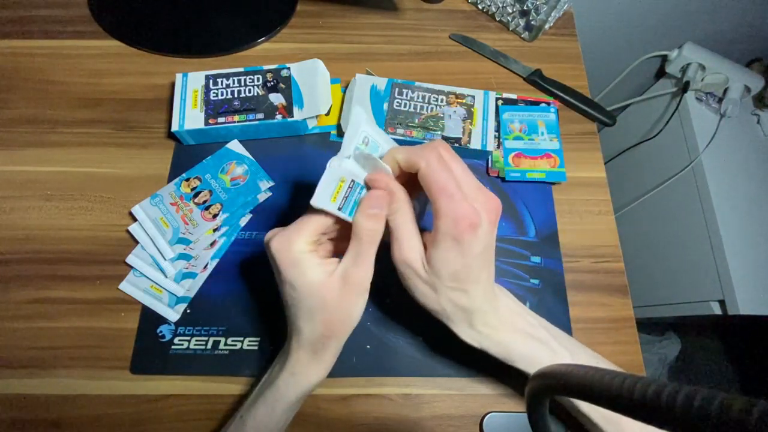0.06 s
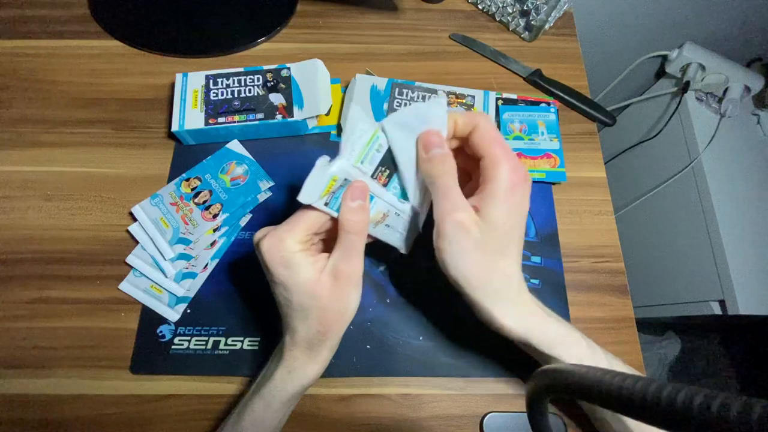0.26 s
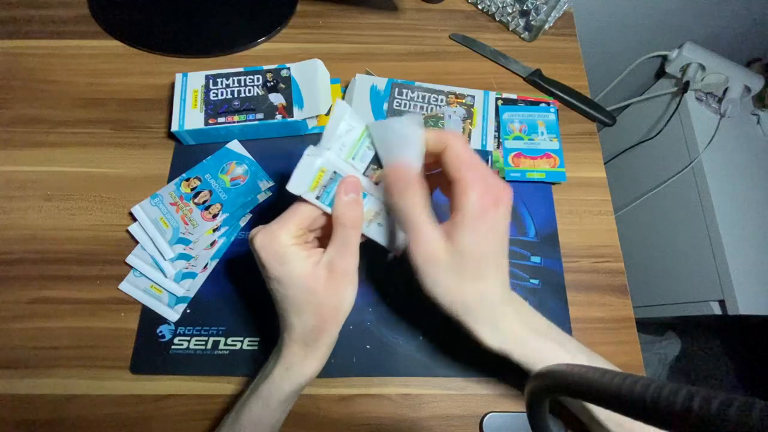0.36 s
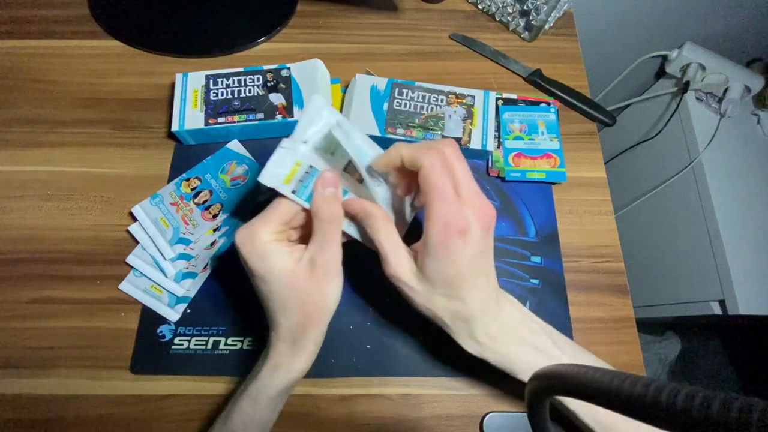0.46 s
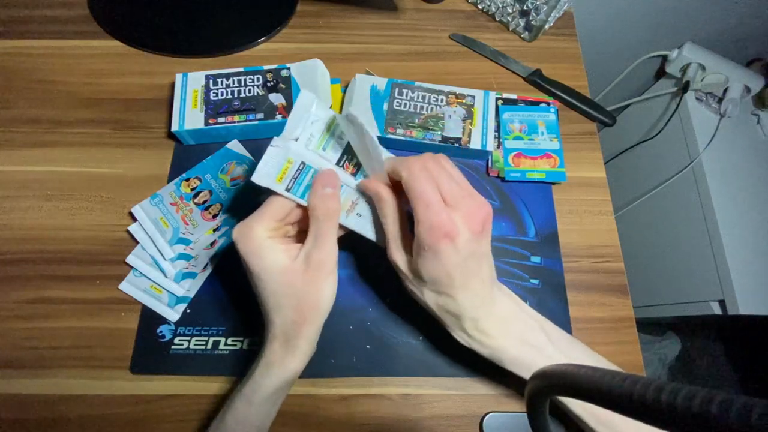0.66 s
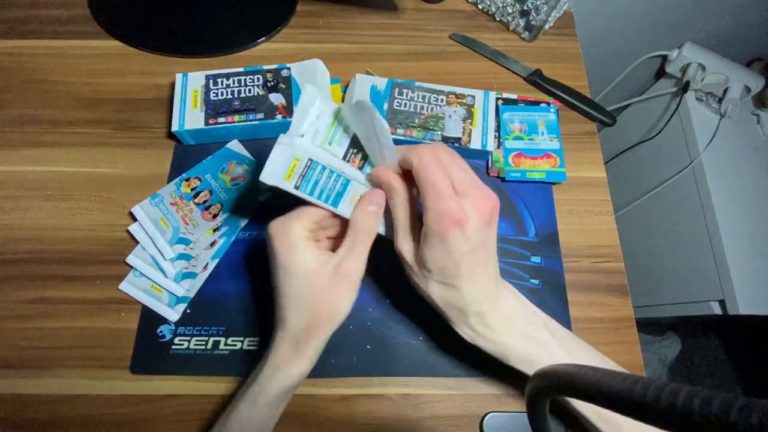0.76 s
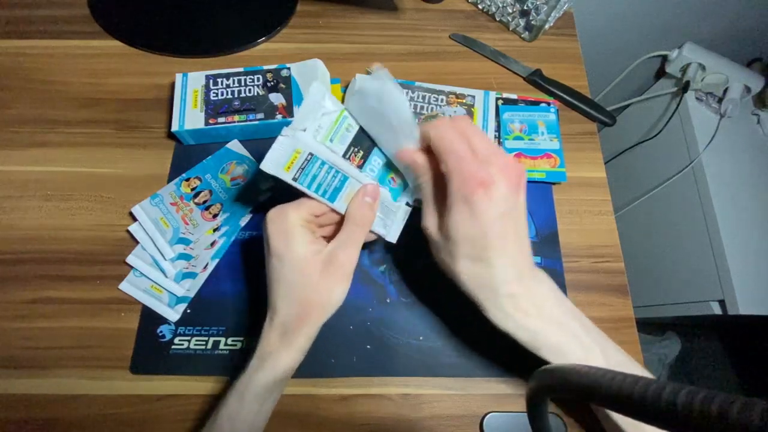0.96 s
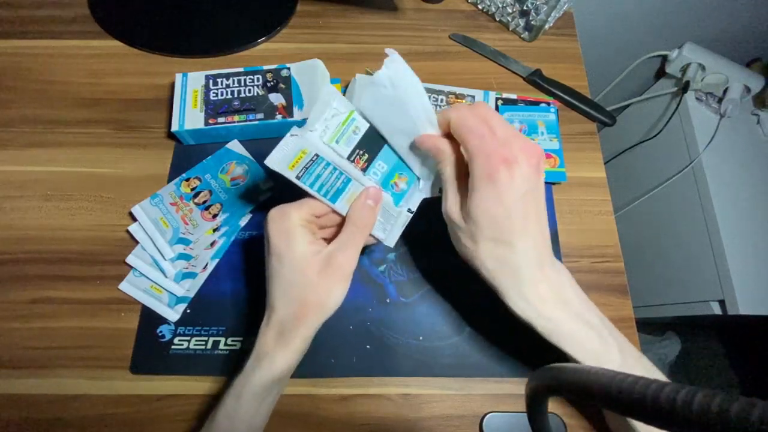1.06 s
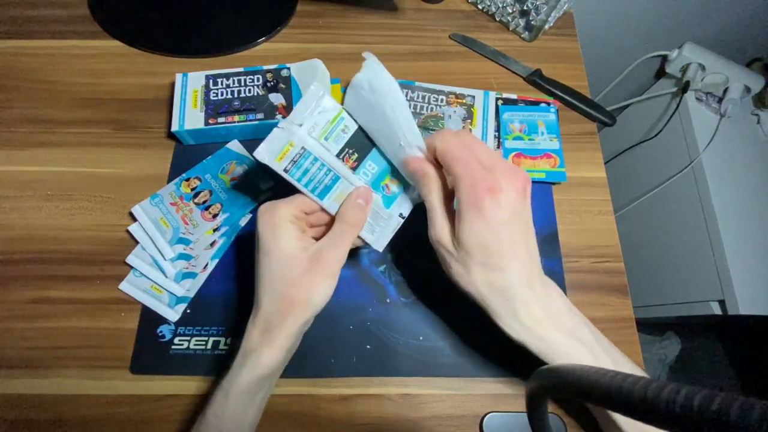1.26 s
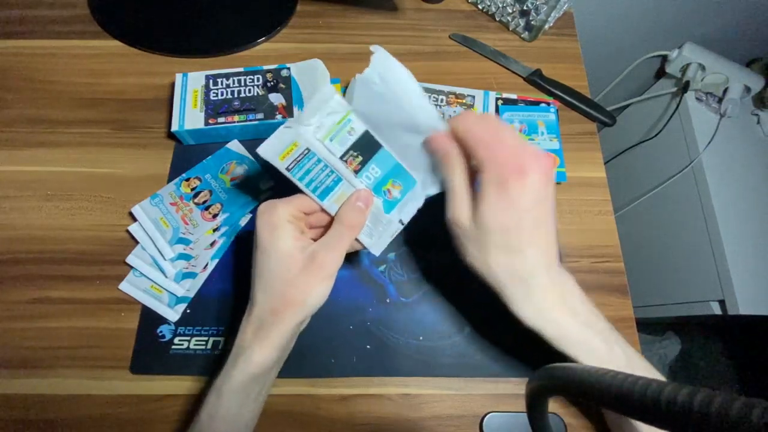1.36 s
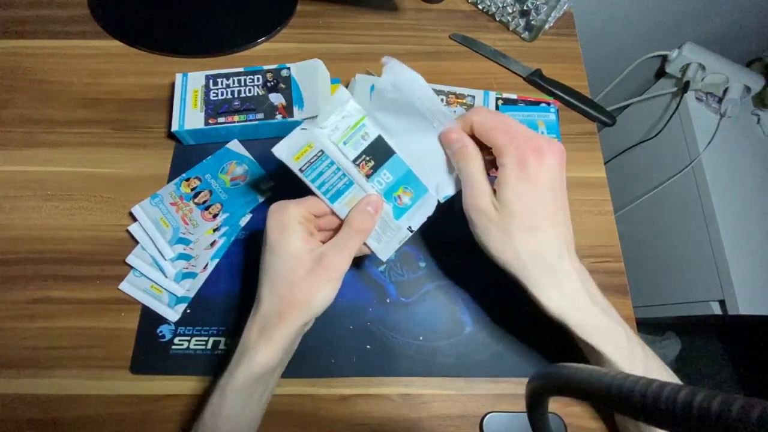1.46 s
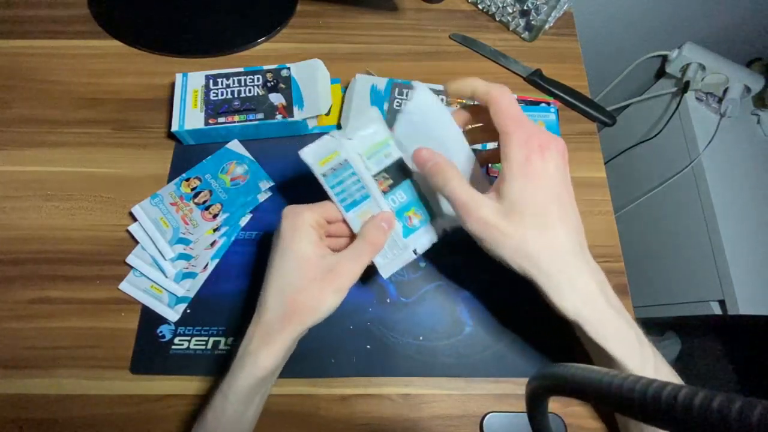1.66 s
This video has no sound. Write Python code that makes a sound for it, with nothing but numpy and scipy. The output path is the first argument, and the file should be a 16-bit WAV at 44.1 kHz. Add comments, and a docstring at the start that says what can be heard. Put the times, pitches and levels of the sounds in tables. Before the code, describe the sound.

Close, crisp foil crinkling over a desk: light finger slides and tiny snaps, one sharp early rip, a snapping peel midway, a fuller final tug, then near silence with faint low room hum.

```python
"""A faint room hum and the hiss of fingers sliding on foil come first, with single sharp snaps of creases.
Over a desk a foil card wrapper is then torn by hand in three quick pulls: a rip, a longer peel and a last tug.
Each pull is a dense train of tiny random clicks in three bands: treble fractures, rasping foil, flapping sheet.
The slide is ticks on shaped noise, each snap a noise burst with a pitched ring, each bump a swell of band noise.
A small room answers, and two close microphone ports pick up the sound."""
import sys
import numpy as np
from scipy import signal
from scipy.fft import rfft, irfft, next_fast_len
from scipy.io import wavfile
from scipy.ndimage import uniform_filter1d

SR = 44100
rng = np.random.default_rng(int(sys.argv[2]) if len(sys.argv) > 2 else 0)


def dump_mix(stems):
    """Bounce the given channels to the path in sys.argv[1] as a 16-bit WAV at rate SR."""
    frames = np.atleast_2d(stems).T  # one column per channel
    limited = np.clip(frames, -1, 1)  # hard clip at full scale
    pcm = np.round(limited * 32767).astype(np.int16)
    wavfile.write(sys.argv[1], SR, pcm)


N = 74970  # length [samples]


def amp(db):
    """Level to amplitude ratio: 20 dB is a factor of ten."""
    return 10 ** (np.asarray(db) / 20)


def unit(x):
    """Normalisation: x scaled to unit rms."""
    return x / np.sqrt(np.mean(x ** 2) + 1e-20)


def along(points, hz):
    """Logarithmic frequency scale: (frequency [Hz], value) points joined by straight lines on it."""
    point_hz, values = np.transpose(points)
    return np.interp(np.log(hz + 1), np.log(point_hz + 1), values)


def gains(rows):
    """Amplitude envelopes: one gain per sample for each dB column, inaudible outside the table's times."""
    times, *levels = np.transpose(rows)
    t = np.arange(N) / SR
    return [amp(np.interp(t, times, level, left=-150, right=-150)) for level in levels]


def filtered(x, response):
    """Linear filtering: the spectrum of x is multiplied by a response of frequency."""
    size = next_fast_len(N + SR // 2)
    hz = np.fft.rfftfreq(size, 1 / SR)
    return irfft(rfft(x, size) * response(hz), size)[..., :N]


def coloured(x, spectrum):
    """Spectral shaping: x filtered by a dB curve and brought to unit rms."""
    return unit(filtered(x, lambda hz: amp(along(spectrum, hz))))


def causal(db):
    """Minimum phase: folding the cepstrum of a dB curve gives a response that never precedes its cause."""
    cepstrum = irfft(db * np.log(10) / 20)
    half = len(cepstrum) // 2
    cepstrum[1:half] *= 2
    cepstrum[half + 1:] = 0
    return np.exp(rfft(cepstrum))


def bell(hz, centre_hz, width_oct):
    """Resonance shape: a bell of height 1 on a log-frequency axis, its standard deviation in octaves."""
    return np.exp(-.5 * (np.log2((hz + 1) / centre_hz) / width_oct) ** 2)


def crackle(spectrum, per_s, scatter_db, count=10, size=500):
    """Shot noise: random clicks ring several foil facets; dividing by the running rms steadies the level."""
    grain_t60_s = 0.0043
    t = np.arange(size) / SR
    facets = rng.standard_normal((count, 2, size)) * amp(-60 * t / grain_t60_s)
    struck = rng.random((count, 1, N)) < per_s / SR / count
    clicks = struck * amp(scatter_db * rng.standard_normal((count, 1, N)))
    grains = signal.oaconvolve(clicks, facets, axes=2).sum(0)[:, :N]
    x = coloured(grains, spectrum)
    running_power = np.abs(uniform_filter1d(np.mean(x ** 2, axis=0), size))
    return x / np.sqrt(running_power + 0.018)  # the floor keeps sparse gaps quiet


def room_hum():
    """Stationary background noise: Gaussian noise shaped into the low hum of the room."""
    hum_db = -76.5
    # hum spectrum: (frequency [Hz], relative level [dB])
    hum_spectrum = [(28, -42), (38, -20), (50, 0.5), (75, -8.5), (130, -12.5), (400, -35), (2000, -35),
                    (16000, -56)]
    return amp(hum_db) * coloured(rng.standard_normal((2, N)), hum_spectrum)


def fingers():
    """Stick-slip friction: skin slipping on foil gives faint ticks on a soft hiss."""
    slips_per_s, scatter_db = 700, 7.0
    ticks_over_hiss_db = 0
    hiss_db, body_db = -2.5, 0  # trims added to the level columns
    # course of the slide: (time [s], relative treble level [dB], relative body level [dB])
    slide_levels = [(0, -55.5, -73), (0.04, -55.5, -72), (0.11, -56.5, -74.5), (0.16, -57, -54.5),
                    (0.33, -39, -74), (0.41, -49.5, -52), (0.46, -55, -60), (0.515, -60, -62),
                    (0.53, -40, -67), (0.545, -45.5, -47.5), (0.56, -58, -69), (0.59, -58, -63),
                    (0.615, -52, -49), (0.665, -48, -60.5), (0.70, -44.5, -57), (0.77, -53.5, -64),
                    (0.805, -54.5, -71.5), (0.86, -43.5, -52.5), (1.0, -34.5, -82), (1.16, -59, -62),
                    (1.19, -43.5, -42.5), (1.22, -53.5, -47), (1.265, -57, -50), (1.30, -55, -50.5),
                    (1.322, -41, -43), (1.34, -50, -56.5), (1.5, -49.5, -54), (1.56, -65.5, -61),
                    (1.625, -65, -41.5), (1.66, -70, -60), (1.7, -72, -58)]
    # treble and body spectra of the rub: (frequency [Hz], relative level [dB])
    hiss_spectrum = [(1200, -47), (3000, 4), (6000, 5), (9500, 9.5), (12000, 0), (16000, -3)]
    body_spectrum = [(60, -13.5), (180, -8), (380, -11), (700, -2.5), (1400, -4), (2600, -4), (5000, -20)]

    def rub(spectrum):
        """Superposition: slip ticks and steady noise share one spectrum."""
        ticks = amp(ticks_over_hiss_db) * crackle(spectrum, slips_per_s, scatter_db)
        hiss = coloured(rng.standard_normal((2, N)), spectrum)
        return unit(ticks + hiss)

    treble, body = gains(slide_levels)
    return amp(hiss_db) * treble * rub(hiss_spectrum) + amp(body_db) * body * rub(body_spectrum)


def flattened(burst, size=24):
    """Spectral whitening: the broad peaks and holes in a burst's spectrum are largely evened out."""
    evenness = 0.96  # share of the burst's colour removed
    spectrum = rfft(burst)
    smooth_power = uniform_filter1d(np.abs(spectrum) ** 2, size)
    return spectrum * causal(-10 * evenness * np.log10(smooth_power))


def creases(size=2048):
    """Snap-through buckling: a crease flips with a crack of about a millisecond and a brief pitched ring."""
    crack_rise_s, tail_db, tail_t60_s = 0.00033, -5.5, 0.014
    ring_db, ring_width_oct = 9, 0.3
    strength_trim_db, bass_trim_db, treble_trim_db = 12, -1, -2
    # snaps: (time [s], relative strength [dB], ring pitch [Hz], relative bass [dB], relative treble [dB])
    snap_events = [(0.0185, -22, 4630, -10.5, 11), (0.1515, -42, 1300, -11, -31),
                   (0.1693, -23, 3070, -22, -2), (0.173, -24, 6200, 8.5, 1), (0.189, -32.5, 3330, -6, -4),
                   (0.2097, -29, 5830, -14, -29), (0.218, -15, 3380, -20, 1), (0.2396, -9.5, 9200, -9, 4),
                   (0.3608, -28.5, 1910, 4, -18), (0.3928, -19, 3260, 5, 0), (0.4148, -23, 6600, -5, -7),
                   (0.4595, -39, 2300, -18, -22), (0.4815, -36, 3140, -5, -33),
                   (0.4982, -21.5, 1800, -9, -6.5), (0.5359, -27.5, 4850, -25, -14),
                   (0.6082, -30.5, 3180, 6.5, -14), (0.618, -31.5, 1510, 7, -12),
                   (0.6235, -26.5, 4960, -6, -4), (0.6353, -17.5, 5900, 1, -0.5),
                   (0.6728, -34, 2270, -8, -16), (0.678, -11.5, 6520, -14, 0),
                   (0.6908, -40.5, 1050, 9, -11), (0.7294, -36.5, 4530, -14, -17),
                   (0.7565, -32, 2570, 8.5, -12), (0.8372, -19.5, 2640, -9.5, -12.5),
                   (0.8522, -21, 4300, -12, -6.5), (0.865, -24, 3900, 3, -3), (0.8945, -22, 7050, -28, -3),
                   (0.922, -15.5, 4040, 3.5, -8), (0.9288, -11.5, 4150, 7.5, 0),
                   (0.9475, -10.5, 4800, -12.5, -13), (0.9559, -12, 5400, -4, -7),
                   (0.9603, -5, 5800, -3.5, -8.5), (0.972, -18, 5260, -7, -3), (0.9824, -16, 4100, -8, -12),
                   (1.008, -11.5, 2760, -10, -16), (1.0138, -10.5, 2500, -9, 4),
                   (1.0182, -11.5, 2750, -1, -3.5), (1.0402, -5.5, 2630, 4.5, -16.5),
                   (1.0644, -18.5, 3100, -3, -4), (1.101, -21.5, 1330, 4, -28), (1.168, -24, 1290, 1, -33),
                   (1.179, -21, 1730, -1, -14), (1.1977, -21, 2370, 6.5, -7.5),
                   (1.2436, -28.5, 4130, 1.5, -5), (1.277, -32, 2300, 6, -11), (1.2846, -22.5, 2360, 7, -4),
                   (1.3158, -22, 2800, -5, -1), (1.3286, -27.5, 5300, -3, 5),
                   (1.3773, -9.5, 2800, -2.5, -4), (1.4236, -13, 2680, 0, -8),
                   (1.4318, -5.5, 2800, 8.5, -11.5), (1.4398, -10.5, 2940, 0, -9),
                   (1.5094, -22.5, 2200, -2.5, -10.5), (1.59, -28, 1170, -8, -16),
                   (1.6208, -23.5, 1760, 10.5, -18.5)]
    # colour common to all snaps: (frequency [Hz], relative level [dB])
    crease_spectrum = [(60, -42.5), (200, -29.5), (700, -2), (1500, 1), (5000, -7), (9000, 5.5), (12000, 0),
                       (16000, -7.5)]

    out = np.zeros((2, N + size))
    t, hz = np.arange(size) / SR, np.fft.rfftfreq(size, 1 / SR)
    crack = t / crack_rise_s * np.exp(-t / crack_rise_s)
    envelope = crack + amp(tail_db) * amp(-60 * t / tail_t60_s)
    for s, db, ring_hz, bass_db, treble_db in snap_events:
        noise = rng.standard_normal((2, size)) * envelope
        bursts = np.array([flattened(burst) for burst in noise])
        ring = ring_db * bell(hz, ring_hz, ring_width_oct)
        bass, treble = bass_db + bass_trim_db, treble_db + treble_trim_db
        tilt = along([(800, bass), (2000, 0.0046), (4000, 0), (7500, treble)], hz)
        snap = irfft(bursts * causal(along(crease_spectrum, hz) + ring + tilt))
        start = max(0, round(s * SR))
        # equal energy before the strength is applied
        out[:, start:start + size] += amp(db + strength_trim_db) * snap / np.linalg.norm(snap[0])
    return out[:, :N]


def pulls():
    """Fracture and resonance: the seam crackles, the foil rasps at a grip-set pitch, the loose sheet flaps."""
    treble_db, middle_db, bass_db = 1.5, -1.5, -1  # trims added to the level columns
    rasp_width_oct = 0.11
    # pulls: (time [s], relative treble level [dB], relative middle level [dB], relative bass level [dB])
    rip_levels = [(0.2, -52, -64, -72), (0.204, -26, -34.5, -44.5), (0.219, -30, -37, -45),
                  (0.224, -37, -43, -53), (0.236, -33.5, -43.5, -60), (0.243, -26, -31, -38.5),
                  (0.271, -22.5, -28.5, -32.5), (0.293, -19, -24.5, -29), (0.305, -26.5, -31, -36),
                  (0.327, -27, -29.5, -32.5), (0.334, -43, -53, -48), (0.383, -57, -53, -52.5)]
    peel_levels = [(0.885, -53, -72, -80), (0.893, -30, -46, -50), (0.921, -48, -42, -64),
                   (0.927, -24, -39, -36.5), (0.942, -30, -37, -51), (0.955, -37, -41, -38),
                   (0.969, -30, -28.5, -46), (1.005, -37.5, -34.5, -50.5), (1.016, -33.5, -20.5, -33.5),
                   (1.046, -37.5, -31, -41), (1.057, -39.5, -32.5, -41), (1.105, -43, -33, -51),
                   (1.148, -59, -59, -51)]
    tug_levels = [(1.345, -57, -54, -58), (1.364, -48, -36.5, -55), (1.382, -34.5, -29.5, -41.5),
                  (1.421, -31.5, -31, -36), (1.437, -29, -29.5, -34.5), (1.447, -30, -23.5, -30.5),
                  (1.461, -44, -58, -51), (1.503, -63, -71.5, -57)]
    # grip in rip, peel and tug: (fracture rate [1/s], rasp pitch [Hz], rasp height [dB])
    grips = [(3970, 2740, 5.5), (1790, 2430, 7.5), (2595, 1260, 7.5)]
    # spectra of seam, foil and loose sheet: (frequency [Hz], relative level [dB])
    fracture_spectrum = [(1500, -64), (3300, 6.5), (4300, -5), (5500, 0), (7000, 1), (9500, 4.5),
                         (11500, -3.5), (15500, -6)]
    foil_spectrum = [(500, -22), (950, -3), (1250, 3), (1900, 6.5), (2700, 0), (3400, -3.5), (4500, -7),
                     (8000, -77)]
    sheet_spectrum = [(40, -45), (110, -17), (180, -5), (320, -4), (490, -4.5), (640, 3.5), (1050, 3.5),
                      (1500, -4.5), (3000, -44)]

    out = np.zeros((2, N))
    for rows, (per_s, rasp_hz, rasp_db) in zip((rip_levels, peel_levels, tug_levels), grips):
        treble, middle, bass = gains(rows)
        fractures = crackle(fracture_spectrum, per_s, scatter_db=0.5)
        foil = crackle(foil_spectrum, per_s, scatter_db=3)
        rasp = unit(filtered(foil, lambda hz: causal(rasp_db * bell(hz, rasp_hz, rasp_width_oct))))
        flap = crackle(sheet_spectrum, per_s, scatter_db=5)
        out += amp(treble_db) * treble * fractures
        out += amp(middle_db) * middle * rasp
        out += amp(bass_db) * bass * flap
    return out


def bumps():
    """Damped resonance: finger bumps and hollow pack flaps are narrow-band noise under a smooth swell."""
    width_oct = 0.23
    # bumps: (centre time [s], relative level [dB], pitch [Hz], standard deviation of the swell [s])
    bump_events = [(0.313, -52.5, 177, 0.016), (0.61, -57, 253, 0.0087), (0.702, -58.5, 190, 0.0048),
                   (1.05, -52.5, 157.6, 0.0065), (1.444, -38, 627, 0.021), (1.602, -62, 402, 0.042),
                   (1.658, -61, 51.4, 0.05)]
    t = np.arange(N) / SR
    out = np.zeros((2, N))
    for s, db, pitch_hz, length_s in bump_events:
        band = filtered(rng.standard_normal((2, N)), lambda hz: bell(hz, pitch_hz, width_oct))
        swell = np.exp(-.5 * ((t - s) / length_s) ** 2)
        rms_in_swell = np.sqrt(np.average(band[0] ** 2, weights=swell ** 2))
        out += amp(db) * swell * band / rms_in_swell
    return out


def ports(x):
    """Interchannel coherence: a shared and an unlike part reach two ports that differ in level and phase."""
    # unlike part relative to the shared part: (frequency [Hz], level [dB])
    spread = [(100, -12), (1500, -14), (3000, -10), (5000, -8.5), (8000, -8.5), (14000, -19)]
    # left minus right: (frequency [Hz], level difference [dB])
    balance = [(100, -1), (430, 0.5), (620, -2.5), (900, -3), (2000, -0.5), (2500, -5.5), (4500, -6.5),
               (5500, -7.5), (7200, -1), (9000, 3), (12000, 0.5)]
    # lead of the left port: (frequency [Hz], phase [rad])
    phase_lead = [(100, 0), (520, -.7), (950, -.5), (1300, 0), (2200, .3), (2650, 1.2), (3300, .4),
                  (4400, 1.2), (5200, .3), (7000, 1.2), (10000, 1.9), (12000, 2.8), (14000, 3.05),
                  (16000, 3.14)]

    common = x[0]
    unlike = filtered(x[1], lambda hz: amp(along(spread, hz)))
    side = np.array([[.5], [-.5]])  # each port takes half of the difference

    def port_response(hz):
        """Complex transfer function: level ratio times phase shift."""
        return amp(side * along(balance, hz)) * np.exp(1j * side * along(phase_lead, hz))

    return filtered(np.array([common + unlike, common - unlike]), port_response)


def room(x, count=8):
    """Reverberation: early desk and wall copies join a short decaying tail that widens with frequency."""
    tail_db, early_db = -17.5, -15
    mono_hz = 1500  # well below this the tail is alike at both ports
    # reverberation time: (frequency [Hz], T60 [s])
    decay_times = [(150, 0.28), (600, 0.24), (3500, 0.26), (9000, 0.071), (16000, 0.016)]

    hz, t, z = signal.stft(rng.standard_normal((2, SR // 2)), SR, nperseg=256)
    width = (hz / np.hypot(hz, mono_hz))[:, None]
    z = np.array([z[0] + width * z[1], z[0] - width * z[1]]) / np.hypot(1, width)
    decay = amp(-60 * t / along(decay_times, hz)[:, None])
    tail = signal.istft(z * decay, SR, nperseg=256)[1]
    tail *= amp(tail_db) / np.linalg.norm(tail[0])
    arrivals = (rng.uniform(.003, .018, count) * SR).astype(int)  # 3 to 18 ms
    tail[:, arrivals] += amp(early_db) * rng.standard_normal(count) / np.sqrt(count)
    return signal.fftconvolve(x, tail, axes=1)[:, :N]


def scene():
    """Superposition: all sources add at the ports, and the room's answer adds to them."""
    near = ports(room_hum() + fingers() + creases() + pulls() + bumps())
    return near + room(near)


def record(dry):
    """Colouration and saturation: desk and microphone filter, soft rounding of peaks, then a band limit."""
    clip_top, clip_hardness = .93, 6  # ceiling [full scale], sharpness of the knee
    top_hz = 16900
    # desk and microphone colour: (frequency [Hz], level [dB])
    desk_colour = [(300, 1.5), (450, 3.5), (640, -1), (1000, 0), (1280, -1), (1550, -3), (2100, -3),
                   (2450, -2), (2800, 1), (3400, -1), (4200, 2), (5200, 4.5), (6200, 3), (7100, 2.5),
                   (9000, -3), (11500, 0), (13500, 2.5), (15400, 4), (16200, -16)]
    x = filtered(dry, lambda hz: causal(along(desk_colour, hz)))
    x = x / (1 + np.abs(x / clip_top) ** clip_hardness) ** (1 / clip_hardness)
    return filtered(x, lambda hz: hz < top_hz)


dry = scene()
out = record(dry)
dump_mix(out)
```